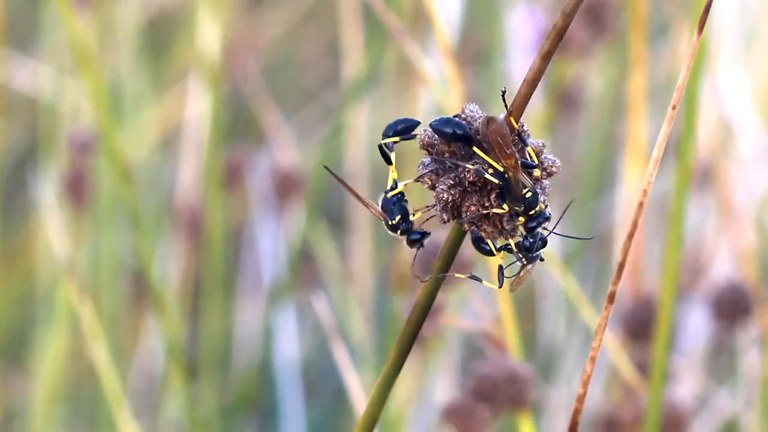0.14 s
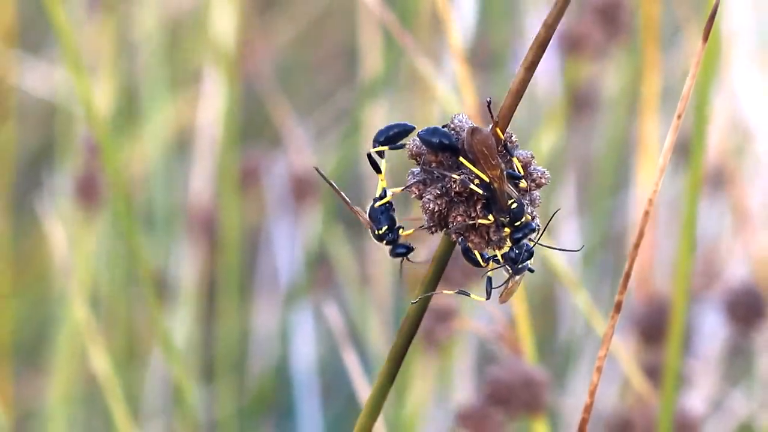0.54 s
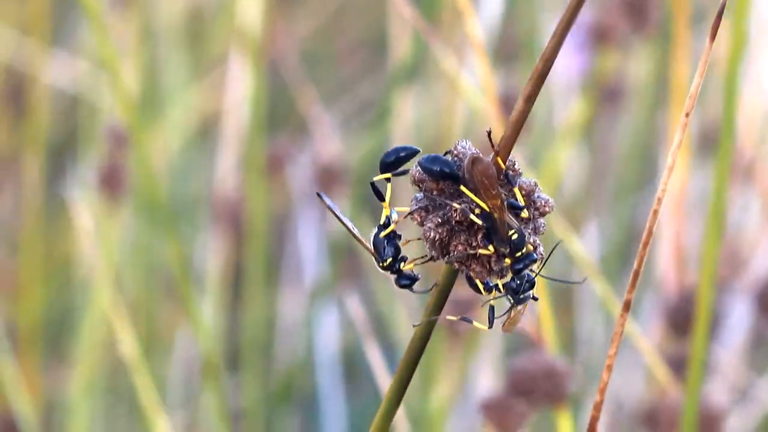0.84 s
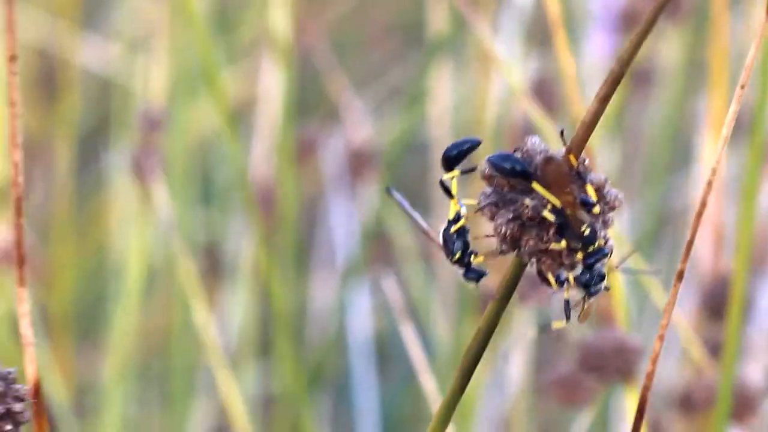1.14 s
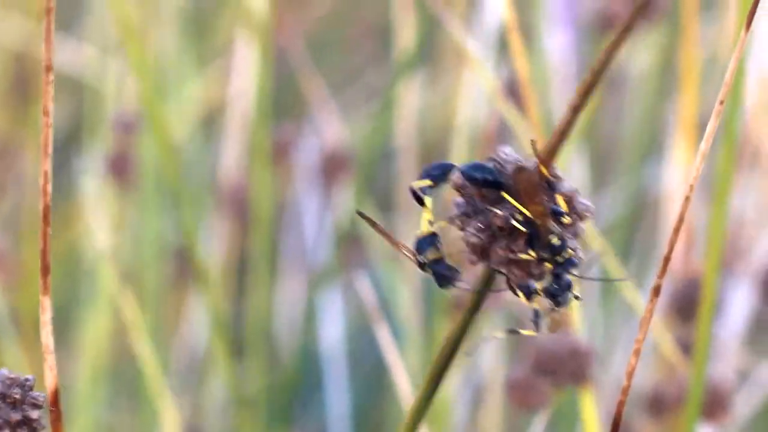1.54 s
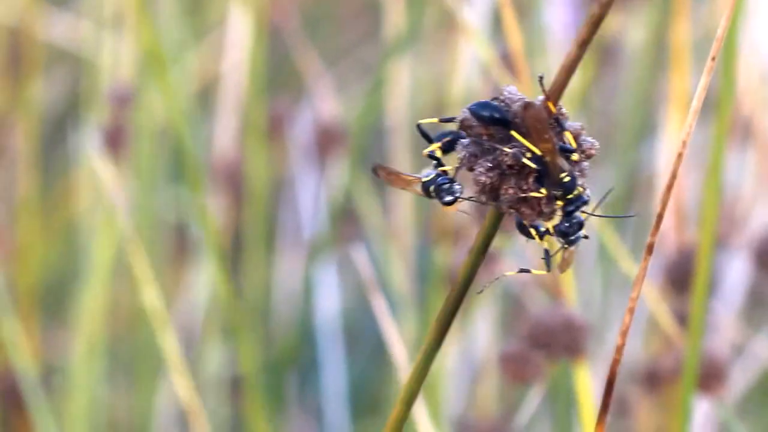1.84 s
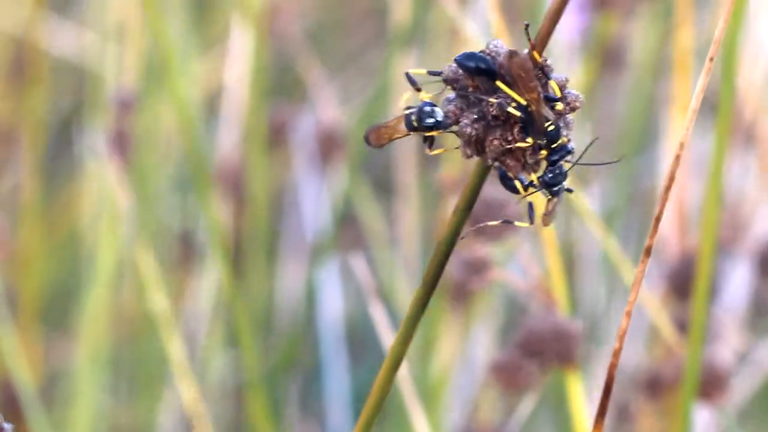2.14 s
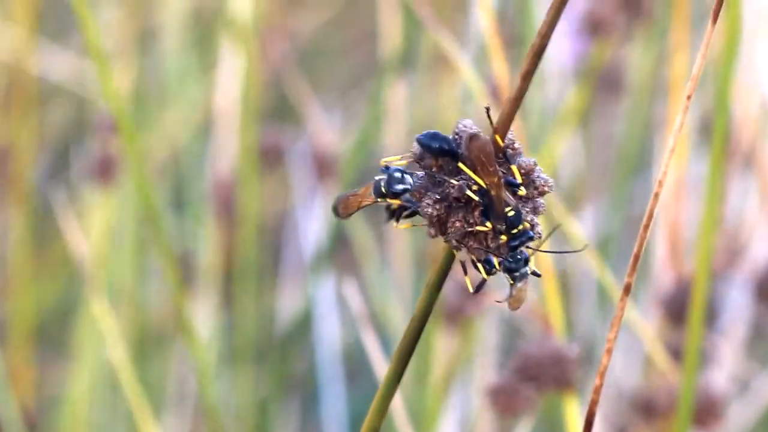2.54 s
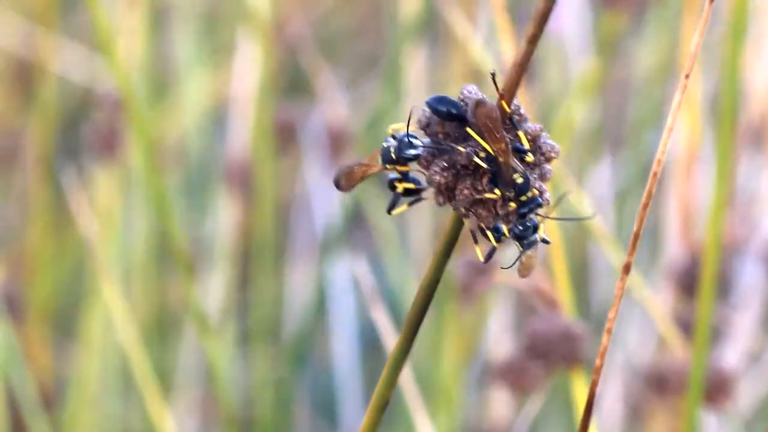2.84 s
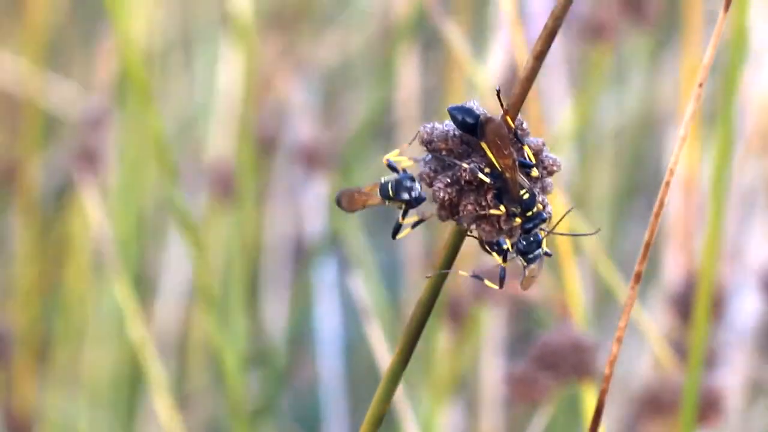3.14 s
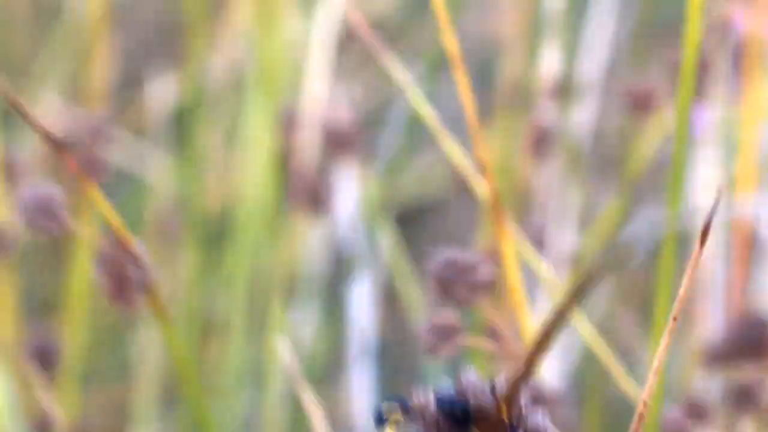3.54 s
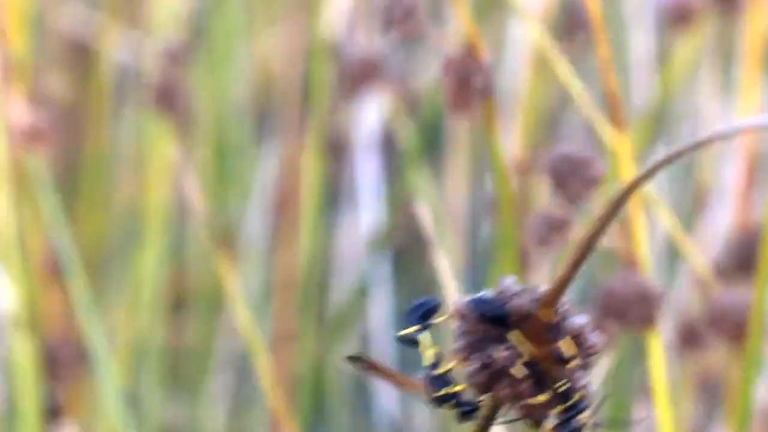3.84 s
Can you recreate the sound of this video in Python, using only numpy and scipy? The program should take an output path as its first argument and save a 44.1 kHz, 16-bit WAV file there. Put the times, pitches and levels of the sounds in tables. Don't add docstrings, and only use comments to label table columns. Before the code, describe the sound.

Wind buffets a handheld microphone in bursts over soft reed hiss, with one hard knock late

```python
import sys
import numpy as np
from scipy import signal
from scipy.fft import rfft, irfft
from scipy.io import wavfile
from scipy.ndimage import uniform_filter1d

SR = 44100
rng = np.random.default_rng(int(sys.argv[2]) if len(sys.argv) > 2 else 0)


def elevation(decibels):
    levels = np.asarray(decibels, float)
    return 10 ** (levels / 20)


def generate_wav(signal):
    frames = np.transpose(np.atleast_2d(signal))
    scaled = np.clip(frames, -1, 1) * 32767
    pcm = np.round(scaled).astype(np.int16)
    wavfile.write(sys.argv[1], SR, pcm)


N = 176400


def evened(x):
    return x / np.sqrt(np.mean(abs(x) ** 2) + 1e-20)


def read_spectrum(points, at):
    hz, db = np.transpose(points)
    return np.interp(np.log(at + 1e-3), np.log(hz), db)


def add(mix, centre_s, sound):
    part = mix[int(centre_s * SR) - len(sound) // 2:][:len(sound)]
    part += sound[:len(part)]


def swell(length_s):
    t = (np.arange(16384) - 8192) / SR
    return 0.5 ** (abs(2 * t / length_s) ** 2.6)


def drifting(noise, bins, frames):
    smooth = uniform_filter1d(noise, size=bins, axis=0)
    return evened(uniform_filter1d(smooth, size=frames, axis=1))


# time_s, level_db
BREEZE_IN_REEDS = [(0, -0.5), (.5, -.5), (1.1, 0), (1.6, 0.5), (1.95, -0.23), (2.6, .5), (3.1, 0),
                   (3.4, 0.2), (3.7, .5), (4, 0.4)]


def reed_noise(colour, level_db, patchy_db, flicker_db, follow):
    size, hop = 1024, 256
    frames = N // hop + 5
    real, imaginary, patches, flicker = rng.standard_normal((frames, size // 2 + 1, 4)).T
    patches = drifting(patches, 20, 16)
    flicker = drifting(flicker, 250, 8)
    breeze = np.interp(np.arange(frames) * hop / SR, *np.transpose(BREEZE_IN_REEDS))
    gain = elevation(patchy_db * patches + flicker_db * flicker + follow * breeze)
    spectra = (real + 1j * imaginary) * gain
    x = signal.istft(spectra, nperseg=size, noverlap=size - hop)[1][:N]
    x = irfft(rfft(x) * elevation(read_spectrum(colour, np.fft.rfftfreq(N, 1 / SR))), N)
    return elevation(level_db) * evened(x)


# frequency_hz, level_db (per Hz)
WASH_COLOUR = [(25, -7), (55, -2), (120, -3), (250, -3), (520, -5.5), (680, -10), (880, -17.5),
               (1400, -38.5)]
# frequency_hz, level_db (per Hz)
HISS_COLOUR = [(600, -24.5), (900, -12.5), (1300, -9.5), (2200, -11.5), (3500, -14), (7000, -22),
               (9500, -25.5), (16000, -26)]


def reeds():
    wash = reed_noise(WASH_COLOUR, level_db=-48, patchy_db=0.92, flicker_db=0.2, follow=0.8)
    hiss = reed_noise(HISS_COLOUR, level_db=-47.5, patchy_db=0.87, flicker_db=0.2, follow=0.86)
    return wash + hiss


# centre_s, length_s, level_db, centre_hz, width_hz
LEAF_RUSTLES = [(0.314, .08, -57, 5000, 3000), (1.004, 0.022, -52.5, 4500, 600),
                (1.031, .022, -48.5, 3460, 450), (1.07, .02, -52.5, 4300, 600),
                (2.683, 0.075, -57, 4440, 500), (2.619, 0.17, -63, 12500, 4000),
                (3.06, .035, -56, 14000, 3500), (3.254, 0.019, -47.5, 1500, 1500),
                (3.5, 0.013, -47, 4180, 1600), (3.558, 0.072, -49, 2600, 1800),
                (3.601, 0.048, -49, 3560, 1500), (3.624, .03, -50, 3150, 900),
                (3.82, .07, -59, 13500, 5000)]


def rustles(mix):
    for centre_s, length_s, level_db, centre_hz, width_hz in LEAF_RUSTLES:
        shape = swell(length_s)
        hz = np.fft.rfftfreq(len(shape), 1 / SR)
        band = np.exp(-2 * ((hz - centre_hz) / width_hz) ** 2)
        noise = irfft(rfft(rng.standard_normal(len(shape))) * band)
        add(mix, centre_s, elevation(level_db) * shape * evened(noise))


# multiple_of_pitch, level_db
EDDY_COLOUR = [(.12, -17), (.4, -5.5), (1, -0.5), (1.8, -6.5), (2.8, -20), (4.5, -31), (9, -70)]


def eddy(length_s, level_db, pitch_hz):
    shape = swell(length_s)
    multiple = np.fft.rfftfreq(len(shape), 1 / SR) / pitch_hz
    colour = elevation(read_spectrum(EDDY_COLOUR, multiple))
    swing = signal.hilbert(irfft(rfft(rng.standard_normal(len(shape))) * colour))
    steadied = (swing / abs(swing) ** 0.44).real
    lump = shape * irfft(rfft(steadied) * np.sqrt(colour))
    return elevation(level_db) * lump / np.sqrt(np.sum(lump ** 2) / np.sum(shape ** 2))


# centre_s, length_s, level_db, pitch_hz
CAPSULE_EDDIES = [(0.481, 0.065, -45.5, 102), (1.007, 0.022, -38.5, 105), (1.067, 0.051, -38.5, 97),
                  (1.108, .03, -42.5, 129), (1.148, 0.027, -41, 83), (1.175, .03, -50, 130),
                  (1.209, 0.017, -39, 65.6), (1.275, 0.024, -37.5, 103), (1.323, 0.029, -32, 101),
                  (1.34, 0.023, -31.5, 130), (1.373, 0.042, -35, 91), (1.403, 0.013, -28.5, 84),
                  (1.445, 0.025, -32.5, 90.5), (1.467, 0.021, -32, 95), (1.506, 0.016, -22.5, 132),
                  (1.524, 0.022, -19, 111), (1.551, 0.019, -34.5, 130), (1.613, 0.02, -35.5, 68),
                  (1.799, 0.017, -30, 95), (1.819, 0.02, -32.5, 92),
                  (2.629, 0.049, -41, 78), (2.764, 0.039, -28, 73.5), (2.793, 0.019, -30, 148),
                      (2.81, .021, -33, 110), (2.852, 0.021, -36.5, 110), (2.875, 0.028, -26.5, 87),
                      (2.91, 0.024, -27, 70.4), (2.946, 0.02, -33.5, 90), (2.975, .036, -33, 140),
                      (3.01, 0.025, -34, 113), (3.049, .03, -42, 90), (3.268, 0.022, -40.5, 110),
                      (3.301, 0.025, -42.5, 109),
                  (3.433, 0.01, -28.5, 103), (3.458, 0.021, -24, 100), (3.489, 0.046, -29, 110),
                    (3.519, 0.01, -27, 144), (3.539, 0.014, -36, 200), (3.556, 0.04, -28, 71.4),
                    (3.588, 0.015, -22, 140), (3.602, 0.027, -27, 147), (3.625, 0.033, -40, 110),
                    (3.7, 0.14, -47.5, 69), (3.769, 0.05, -46, 60), (3.804, 0.024, -24, 138),
                    (3.83, 0.019, -24.5, 158), (3.864, 0.033, -29, 95), (3.896, 0.036, -36.5, 69),
                    (3.93, 0.034, -36.5, 73), (3.987, 0.02, -29, 76.6)]


def gusts(mix):
    for centre_s, *settings in CAPSULE_EDDIES:
        add(mix, centre_s, eddy(*settings))


# centre_s, peak_db,
# pitch_hz
AIR_SLAPS = [(1.055, -38, 200), (1.28, -32.5, 167), (1.344, -28, 190), (1.422, -32, 210), (1.466, -32, 220),
             (1.5009, -17, 296), (1.518, -16.5, 230), (1.5243, -25.5, 536), (1.553, -28, 208),
             (1.793, -26, 240), (2.75, -33, 170), (2.79, -30.5, 282), (2.809, -33, 190), (2.889, -24, 185),
             (2.91, -27.5, 330), (2.943, -29, 169), (2.982, -25.5, 234), (3.002, -32, 210),
             (3.265, -40, 200), (3.4702, -14.5, 240), (3.4782, -9, 480), (3.523, -22, 200),
             (3.537, -24, 253), (3.588, -14, 296), (3.598, -25.5, 220), (3.622, -28, 220),
             (3.802, -20.5, 260), (3.815, -24.5, 260), (3.828, -21.5, 239), (3.857, -30, 297)]


def slaps(mix):
    for centre_s, peak_db, pitch_hz in AIR_SLAPS:
        cycles = (np.arange(2048) - 1024) / SR * pitch_hz
        swing = np.cos(2 * np.pi * (cycles + rng.random()))
        add(mix, centre_s, elevation(peak_db) * swing * np.exp(-(cycles / 0.48) ** 2))


def gliding_phase(t, pitch_hz, glide_hz_per_s):
    return 2 * np.pi * (pitch_hz * t + glide_hz_per_s * t ** 2 / 2)


def knock():
    t = (np.arange(2048) - 1024) / SR
    push_length_s, shake_late_s, shake_length_s = 0.0035, 0.00161, 0.0042
    push = np.sin(gliding_phase(t, 140, 7100)) * np.exp(-abs(t / push_length_s) ** 3)
    late = t - shake_late_s
    shake = elevation(-19.5) * np.cos(2 * np.pi * 900 * late)
    shake += elevation(-23.5) * np.cos(gliding_phase(late, 1266, 79000))
    fade_s = np.where(late < 0, shake_length_s, shake_length_s * 0.15)
    return elevation(-3.8) * push + shake * np.exp(-(late / fade_s) ** 2)


def scene():
    mix = reeds()
    rustles(mix)
    gusts(mix)
    slaps(mix)
    add(mix, 3.4752, knock())
    return mix[None]


def band_limit(x):
    return signal.sosfilt(signal.butter(12, 15760, fs=SR, output="sos"), x)


def record(dry):
    edge = signal.firwin(1023, 16600, window=("kaiser", 9), fs=SR)
    return band_limit(signal.oaconvolve(dry, edge[None], "same"))


dry = scene()
out = record(dry)
generate_wav(out)
```